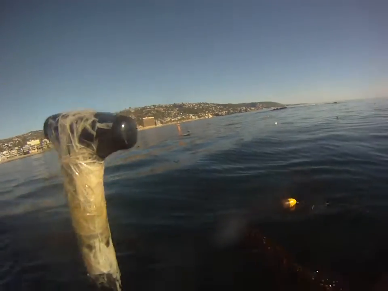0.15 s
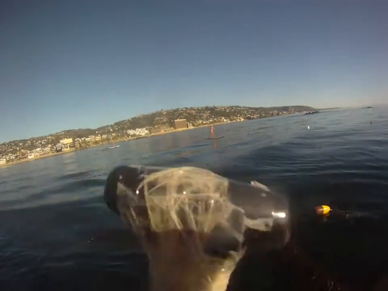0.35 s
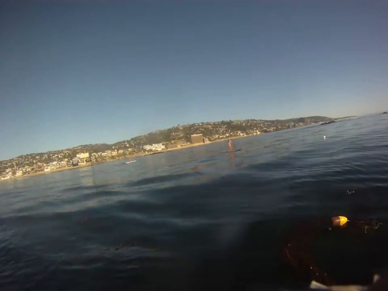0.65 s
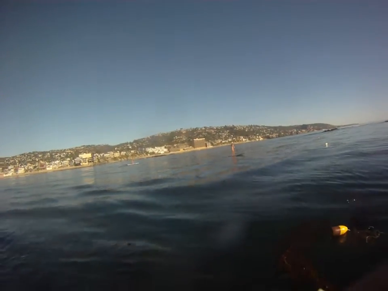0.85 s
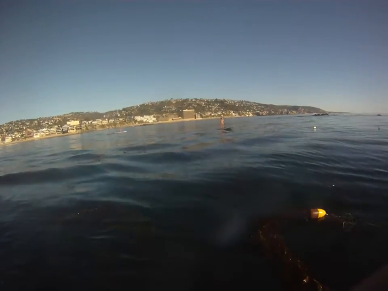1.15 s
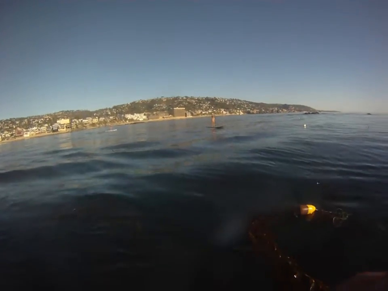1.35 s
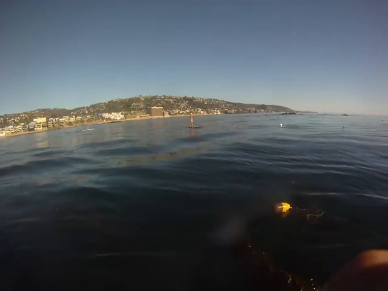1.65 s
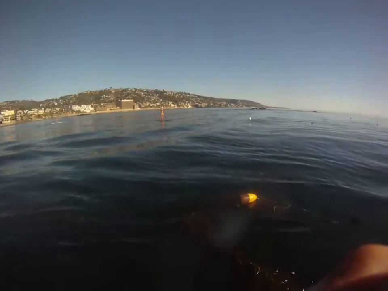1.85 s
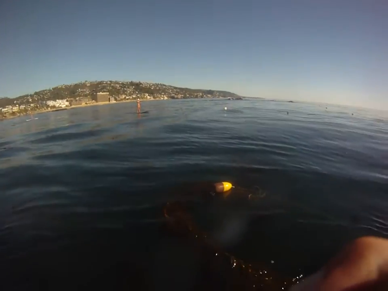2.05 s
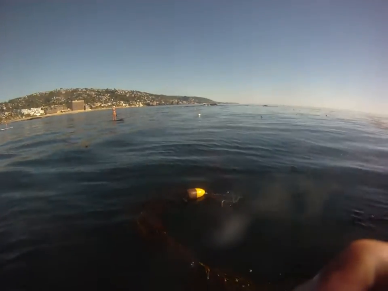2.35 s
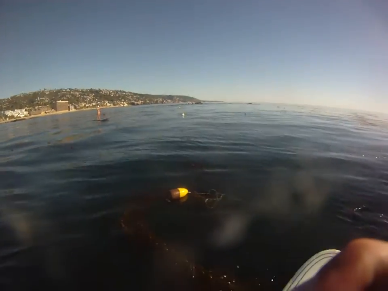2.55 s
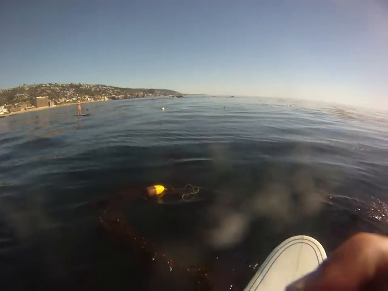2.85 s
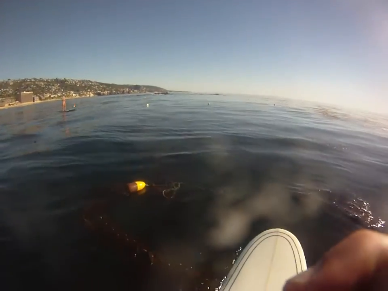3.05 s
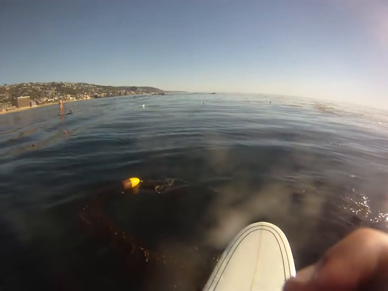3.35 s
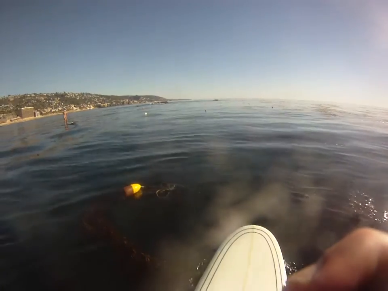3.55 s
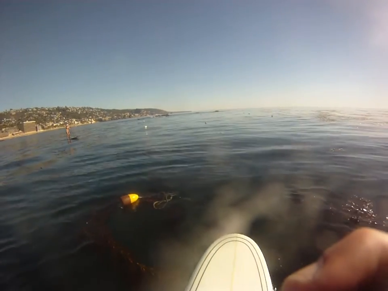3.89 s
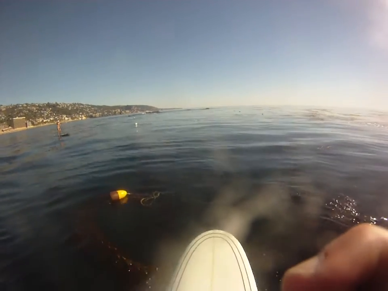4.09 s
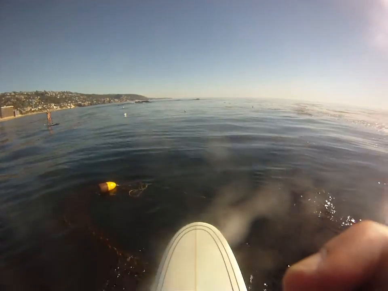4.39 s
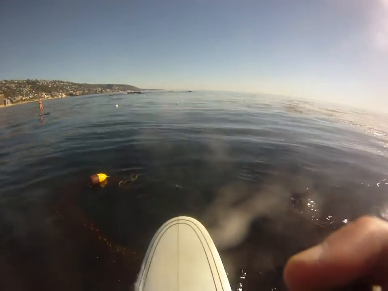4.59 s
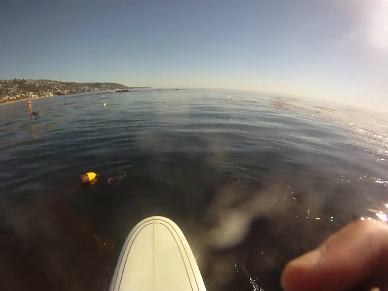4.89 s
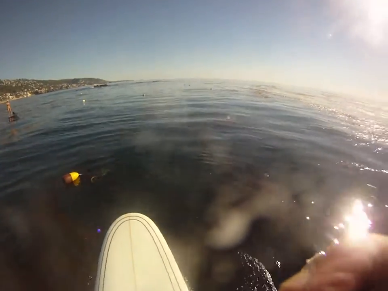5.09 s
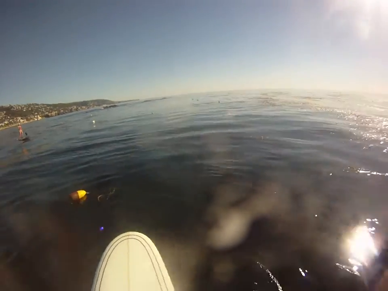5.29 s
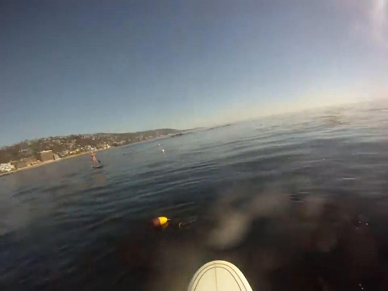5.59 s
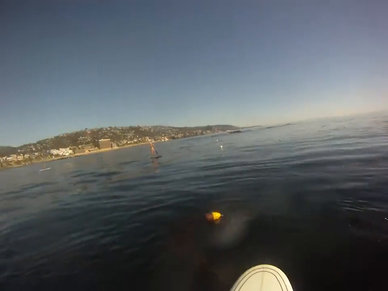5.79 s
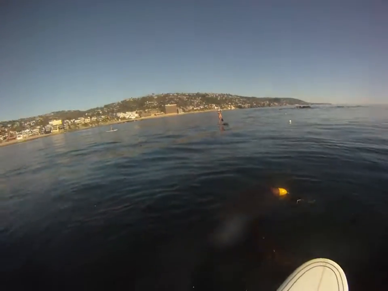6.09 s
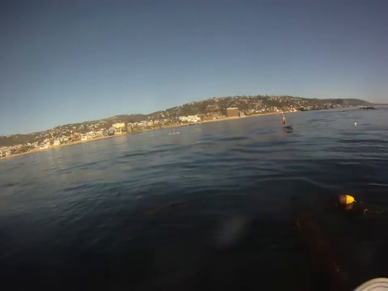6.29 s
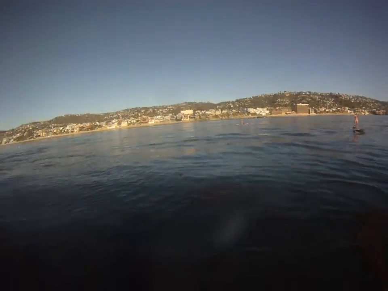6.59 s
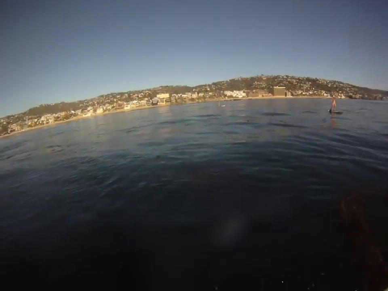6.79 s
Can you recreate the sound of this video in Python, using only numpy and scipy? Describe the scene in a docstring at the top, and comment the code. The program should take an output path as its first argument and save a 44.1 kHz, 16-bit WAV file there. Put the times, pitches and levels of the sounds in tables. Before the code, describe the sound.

Inside a waterproof camera case just above calm sea, a low rumble runs throughout. A wet hand rubs and bumps the casing first, then isolated knocks stand out among faint washes, laps and dripping bubbles. After five seconds a muffled slosh and vigorous rubbing arrive, followed by one hard clack, more short drags and a hollow bump.

```python
"""A camera in a waterproof case rides just above a calm sea on a paddleboard, over a low rumble of noise.
First a wet hand and sleeve rub the case (noise of tiny slips through its resonances) and bump it (dying sines).
Then knocks stand out between small washes, laps and drops of water (noise, bubbles and rising sines).
After five seconds a muffled slosh of bubbles arrives, the rumble lifts and the rubbing returns.
Past six seconds comes the hardest clack, then more drags and a last hollow bump."""
import sys
import numpy as np
from scipy import signal
from scipy.fft import rfft, irfft, next_fast_len
from scipy.io import wavfile
from scipy.ndimage import uniform_filter1d, map_coordinates

SR = 44100
rng = np.random.default_rng(int(sys.argv[2]) if len(sys.argv) > 2 else 0)


def transcribe(u):
    """Save the signal u as a 16-bit wav file named by the first command-line argument.

    u: samples, shape (n,) or (channels, n), limited to [-1, 1]; the rate is SR.
    q: integer samples, one column per channel.
    """
    v = np.clip(np.atleast_2d(u).T, -1, 1)
    q = np.round(v * 32767).astype(np.int16)
    wavfile.write(sys.argv[1], SR, q)


N = 306054  # length [samples]


def amp(db):
    """Decibels to gain."""
    return 10 ** (np.asarray(db) / 20)


def unit(x):
    """Scaled to rms 1."""
    return x / np.sqrt(np.mean(x ** 2) + 1e-20)


def peak_one(x):
    """Scaled to peak 1."""
    return x / np.abs(x).max()


def along(points, hz):
    """(frequency [Hz], value) points joined on a log-frequency axis."""
    f, v = np.transpose(points)
    return np.interp(np.log(hz + 1), np.log(f + 1), v)


def curve(rows):
    """A timed table, one value per sample."""
    return np.interp(np.arange(N) / SR, *np.transpose(rows))


def wobble(rate):
    """A smooth random curve, rate knots a second."""
    knots = rng.standard_normal(int(N * rate / SR) + 4)
    return map_coordinates(knots, [np.arange(N) * rate / SR])


def filtered(x, response):
    """x shaped by a gain that depends on frequency."""
    m = next_fast_len(len(x) + 8192)
    spectrum = rfft(x, m) * response(np.fft.rfftfreq(m, 1 / SR))
    return irfft(spectrum, m)[:len(x)]


def add(track, s, sound):
    """Mix a sound into the track at time s."""
    part = track[max(round(s * SR), 0):][:len(sound)]
    part += sound[:len(part)]


def ring(t, hz, t60):
    """A sine that dies by 60 dB in t60 seconds."""
    return np.sin(2 * np.pi * hz * t) * np.exp(-np.log(1000) * t / t60)


def slips(size, per_second, smooth):
    """Friction: a spray of tiny random slips on an even hiss; rms 1."""
    sparks = rng.standard_normal(size) * (rng.random(size) < per_second / SR)
    return unit(unit(sparks) + smooth * rng.standard_normal(size))


def patchy(x, depth_db):
    """Each band of x flutters by itself, as when the spot of contact shifts; rms 1."""
    bands = signal.stft(x, nperseg=256)[2]
    flutter = rng.standard_normal(bands.shape)
    for _ in range(2):
        flutter = uniform_filter1d(flutter, size=3, axis=0)
        flutter = uniform_filter1d(flutter, size=7, axis=1)
    return unit(signal.istft(bands * amp(depth_db * unit(flutter)), nperseg=256)[1][:N])


def swells(rows, attack_s, release_s):
    """Gain of (start, length, level) events that rise, hold and die away; overlaps add in power."""
    power, t = np.zeros(N), np.arange(SR) / SR
    for s, length, db in rows:
        rise = (1 - np.exp(-t / attack_s)) ** 2
        shape = rise * np.exp(-np.maximum(t - length, 0) / release_s)
        add(power, s, (amp(db) * shape / shape.max()) ** 2)
    return np.sqrt(power)


def bubbles(per_second, centre_hz, spread, cycles, size_db):
    """A cloud of small bubbles, each rising in pitch as it dies; rms 1."""
    count = int(per_second * N / SR)
    start = rng.integers(0, N, (count, 1))
    pitch = rng.standard_normal((count, 1))
    size = rng.exponential(size=(count, 1))
    t = np.arange(600) / SR
    hz = centre_hz * np.exp(spread * np.clip(pitch, -2, 2))
    age = t * hz / cycles
    tone = np.sin(2 * np.pi * hz * t * (1 + 0.04 * np.minimum(age, 4)))
    grains = amp(size_db * np.minimum(size, 4)) * np.exp(-age) * tone
    return unit(np.bincount((start + np.arange(len(t))).ravel(), grains.ravel())[:N])


# air and wall resonances of the case, colouring rubbing and water: (centre [Hz], width [Hz], level [dB])
CASE_RESONANCES = [(924, 183, -3), (1200, 350, -4), (1674, 200, -7.5), (2190, 393, 1.5), (3244, 445, -6),
                   (3647, 292, -3.5), (4570, 1560, -18), (7270, 1300, -21.5), (8350, 280, -9.5),
                   (8890, 175, -11.5), (9763, 250, -9.5), (10680, 790, -23), (13500, 480, -32),
                   (14470, 300, -18), (15270, 300, -21.5)]
# gain laid over the resonances, which deepens or fills their valleys: (frequency [Hz], gain [dB])
CASE_VALLEYS = [(200, 16.5), (500, -2.5), (800, -3.5), (5400, 0), (6000, -13.5), (6500, 0), (11000, 2.5),
                (11500, -6), (12450, -9), (12900, 17.5), (15250, 3), (15600, -31)]


def case(hz):
    """Gain of the case: its resonances add in power, with valleys between them."""
    power = sum(amp(db) ** 2 / (1 + ((hz - centre) / width) ** 2 * 2) ** 2
                for centre, width, db in CASE_RESONANCES)
    return np.sqrt(power) * amp(along(CASE_VALLEYS, hz))


def treble_hiss():
    """A faint, narrow band of hiss high in the treble."""
    band = filtered(rng.standard_normal(N), lambda hz: np.exp(-((hz - 12000) / 200) ** 2))
    return amp(-83) * unit(band)


# wind and handling, before a 5 dB lift: (time [s], level [dB])
RUMBLE_LEVEL = [(0.0, -49.5), (0.09, -48.5), (0.73, -43.5), (4.95, -39.5), (5.37, -29.5), (5.59, -39.5),
                (6.59, -43), (6.82, -36.5), (6.94, -35)]


def rumble():
    """Wind and the holding hand shake the case in soft low lumps."""
    # (frequency [Hz], gain [dB])
    colour = [(10, -2.5), (24, 4.5), (50, -2.5), (70, -9), (100, -14.5), (150, -22.0),
              (220, -30), (350, -35.5), (700, -42.5), (2000, -67.0)]
    low = unit(filtered(rng.standard_normal(N), lambda hz: amp(along(colour, hz))))
    # even out the noise's own swells, then give it new ones
    swell = np.sqrt(np.abs(uniform_filter1d(low ** 2, SR // 5)) + 1e-6)
    lumps = unit(low / swell * amp(2.8 * np.clip(wobble(16), -2, 1.5)))
    return lumps * amp(curve(RUMBLE_LEVEL) + 5.0)


# tone of the washing water before the case: (frequency [Hz], gain [dB])
WATER_TONE = [(200, 3.5), (500, 12), (900, 0.5), (1500, -3), (2150, -4), (2560, 1.5), (3500, -3.5),
              (5000, 2.5), (7000, 1.5), (8500, -5), (9450, 0), (9900, -4), (15000, -3)]
# wavelets washing along the board: (start [s], length [s], level [dB])
WAVELET_EVENTS = [(1.28, 0.069, -58), (1.68, 0.056, -67), (2.32, 0.096, -61), (2.75, 0.1, -59.5),
                  (3.45, 0.03, -56), (3.77, 0.12, -53.5), (3.97, 0.089, -61), (4.14, 0.08, -59.5),
                  (4.43, 0.25, -55.5), (4.8, 0.13, -64.5), (4.94, 0.096, -60)]
WAVELET_ATTACK_S, WAVELET_RELEASE_S = 0.014, 0.054  # a quick rise and slower draining
RIPPLE_DB = -61  # constant ripples under the wavelets
# low, muffled slosh against the board: (start [s], length [s], level [dB])
SLOSH_EVENTS = [(5.08, 0.093, -55), (5.255, 0.2, -50), (5.325, 0.029, -38.5)]
SLOSH_ATTACK_S, SLOSH_RELEASE_S = 0.018, 0.015
# little laps, each a brief burst around one pitch: (start [s], length [s], level [dB], pitch [Hz])
LAP_EVENTS = [(0.378, 0.0085, -41.5, 1190), (1.041, 0.039, -55.5, 930), (2.129, 0.18, -59, 1040),
              (2.833, 0.018, -55, 660), (3.803, 0.09, -54, 2440), (4.497, 0.05, -55.5, 2500),
              (4.645, 0.031, -53.5, 2500), (6.479, 0.06, -53.5, 1010), (6.584, 0.079, -51, 1010),
              (6.891, .018, -66, 1970)]
# single drops, before a 1.5 dB trim: (time [s], level [dB], pitch [Hz], 60 dB decay [s])
DROP_EVENTS = [(2.8295, -40, 2160, 0.035), (2.8962, -42, 2200, 0.029), (3.7998, -39, 2450, 0.038),
               (4.4282, -34.5, 1360, 0.048), (4.845, -45, 2540, 0.026)]


def water():
    """Ripples fizz and lap along the board, a slosh rolls against it, and drops ring as rising bubbles."""
    fizz = slips(N, per_second=1100, smooth=1.3)
    fizz += 0.28 * bubbles(per_second=900, centre_hz=2000, spread=0.45, cycles=4, size_db=2)
    toned = filtered(fizz, lambda hz: case(hz) * amp(along(WATER_TONE, hz)))
    wash = patchy(toned, depth_db=2.2)
    flow = np.hypot(amp(RIPPLE_DB), swells(WAVELET_EVENTS, WAVELET_ATTACK_S, WAVELET_RELEASE_S))
    out = wash * flow * amp(1.7 * wobble(36))

    slosh = bubbles(per_second=1700, centre_hz=800, spread=0.49, cycles=1.6, size_db=1.5)
    out += swells(SLOSH_EVENTS, SLOSH_ATTACK_S, SLOSH_RELEASE_S) * amp(wobble(90)) * slosh

    for s, length, db, pitch_hz in LAP_EVENTS:
        u = np.linspace(0, 1, int(length * SR))
        band = lambda hz: 1 / (1 + ((hz - pitch_hz) / 200) ** 2)
        lap = unit(filtered(rng.standard_normal(len(u)), band))
        early_swell = np.sqrt(np.abs(np.sin(np.pi * np.sqrt(u))))
        add(out, s, amp(db) * lap * early_swell)

    t = np.arange(SR // 5) / SR
    for s, db, hz, t60 in DROP_EVENTS:
        impact = 0.8 * ring(t, hz * 0.55, 0.0035)
        # a bubble and a smaller companion ring and rise
        bubble = ring(t, hz * (1 + 1.1 * t), t60)
        companion = 0.31 * ring(t, hz * 1.09 * (1 + 2.0 * t), t60)
        add(out, s, amp(db - 1.5) * (impact + bubble + companion))
    return out


# long drags of hand and sleeve over the case: (start [s], length [s], level [dB])
SLIDE_EVENTS = [(.178, 0.056, -49.5), (.298, 0.097, -43.5), (.39, .105, -42.5), (.525, 0.08, -45),
                (.565, 0.15, -41), (.765, 0.044, -50), (.83, 0.12, -57), (.942, 0.062, -46.5),
                (1.105, 0.16, -51), (1.955, 0.062, -47.5), (2.24, 0.021, -46.5), (5.025, 0.094, -51.5),
                (5.135, 0.051, -42), (5.228, 0.036, -44), (5.325, 0.19, -40), (5.53, 0.026, -41.5),
                (5.592, .2, -40.5), (5.675, 0.087, -36.5), (5.78, 0.05, -46), (5.85, 0.035, -58),
                (6.08, 0.034, -54), (6.15, 0.068, -50.5), (6.225, 0.058, -48.5), (6.308, 0.098, -44),
                (6.526, 0.039, -43.5), (6.69, 0.081, -47), (6.85, .09, -52.5)]
SLIDE_ATTACK_S, SLIDE_RELEASE_S = 0.011, 0.019  # the hand takes hold and lets go
SLIDE_USUAL_DB = -45
# brightness [dB per octave] at the usual level, and its rise per dB of level
SLIDE_TILT_DB, SLIDE_TILT_GROWS = -2.5, 0.053


def sliding():
    """Skin and sleeve drag over the case; the grip wavers, and louder slides are brighter."""
    friction = slips(N, per_second=2200, smooth=0.75)
    rub = patchy(filtered(friction, case), depth_db=2.7)
    treble = filtered(rub, lambda hz: hz ** 2 / (hz ** 2 + 5000 ** 2))
    drag = swells(SLIDE_EVENTS, SLIDE_ATTACK_S, SLIDE_RELEASE_S)
    drag_db = 20 * np.log10(drag + 1e-6)
    tilt_db = SLIDE_TILT_DB + SLIDE_TILT_GROWS * (drag_db - SLIDE_USUAL_DB)
    # the treble is taken as two octaves above the body
    rub = rub + (amp(2 * tilt_db) - 1) * treble
    return rub * drag * amp(0.44 * wobble(45))


# quick scuffs on the case: (start [s], length [s], level [dB], favoured pitch [Hz], emphasis [dB])
SCUFF_EVENTS = [(0.655, 0.059, -32.5, 2200, 8.5), (1.062, 0.02, -49, 3500, 6),
                (1.163, 0.01, -41.5, 2120, 12), (1.291, 0.018, -46, 1800, 13), (1.889, 0.015, -58, 3600, 6),
                (2.143, 0.032, -53.5, 3380, 6), (2.367, 0.028, -52.5, 3300, 4.5),
                (2.408, 0.028, -53.5, 3270, 3), (2.467, 0.023, -56, 3330, 4.5),
                (2.517, 0.023, -56, 3350, 8), (2.58, 0.036, -53, 2260, 6), (3.218, 0.02, -57.5, 3380, 7),
                (4.867, .0123, -51.5, 3650, 3), (5.324, 0.012, -40, 2080, 9),
                (5.37, 0.024, -29.5, 3320, 11), (5.432, .03, -25.5, 2000, 2.5),
                (6.314, .045, -37.5, 2200, 3.5)]


def scuffs():
    """Short hard drags swell and let go, each favouring its own pitch."""
    out = np.zeros(N)
    for s, length, db, pitch_hz, emphasis_db in SCUFF_EVENTS:
        u = np.linspace(0, 1, int(length * SR))
        colour = lambda hz: case(hz) * amp(emphasis_db * np.exp(-((hz - pitch_hz) / 350) ** 2))
        rub = unit(filtered(slips(len(u), per_second=4000, smooth=0.82), colour))
        swell = np.abs(np.sin(np.pi * u)) ** 0.5
        add(out, s, amp(db) * rub * swell)
    return out


# bumps on the case:
# (time [s], thump [dB], thump pitch [Hz], shell [dB], favoured pitch [Hz], hollow ring [dB])
KNOCK_EVENTS = [(0.596, -23, 156, -43, 298, -55), (0.655, -18.5, 48, -58, 330, -60),
                (.8405, -18, 77, -45.5, 500, -53), (2.078, -11, 73, -40, 735, -35.5),
                (2.1598, -11.5, 63, -44, 500, -58), (2.5395, -7.5, 96, -26.5, 1150, -37),
                (3.0671, -7.5, 144, -18.5, 1200, -31.5), (4.2174, -19, 69, -40, 1060, -37.5),
                (5.249, -4, 98, -20, 2080, -31), (5.4159, -23, 159, -23, 1280, -50),
                (5.475, -15.5, 69, -33, 900, -42), (6.1642, -11, 227, -2, 740, -28),
                (6.1699, -18, 302, -17, 574, -33.5), (6.186, -19.5, 89, -36, 560, -35),
                (6.8363, -26, 130, -39, 900, -21.5), (6.85, -14.5, 60.4, -46, 500, -43)]
# modes of the struck shell, a brief clack: (frequency [Hz], relative level [dB], 60 dB decay [s])
SHELL_MODES = [(312, -21, 0.046), (522, 13.5, 0.0094), (880, 11, 0.0093), (1287, -7.5, 0.022),
               (2084, -7, 0.034), (2720, -10.5, 0.031), (4150, -1, 0.013), (7400, 22.5, 0.0049)]
# modes of the small hard latch: (frequency [Hz], relative level [dB], 60 dB decay [s])
LATCH_MODES = [(9200, -13, 0.015), (10700, -3, 0.014), (11200, 0, 0.022), (12910, 1.5, 0.023),
               (14090, -46, .014)]
# longer, hollow ring of the case on its grip: (frequency [Hz], relative level [dB], 60 dB decay [s])
HOLLOW_MODES = [(164, 3, 0.21), (216, 1, 0.12), (342, -2, 0.11), (438, -0.5, 0.052), (884, 1.5, 0.057),
                (1220, -8.5, 0.068)]
# cut-off at a shell level of 0 dB; softer blows are duller
CONTACT_HZ, CONTACT_DB_PER_OCTAVE = 2350, 29.5
TICK_DB, TICK_GROWS = -18, 0.64  # latch at a shell level of 0 dB; its dB per dB of shell


def struck(modes, t):
    """Modes ringing together, their levels and pitches a little different at each blow."""
    return sum(amp(db + rng.normal(0, 3.7)) * ring(t, hz * (1 + rng.normal(0, 0.0032)), t60)
               for hz, db, t60 in modes)


def struck_shell(t, favoured_hz, contact_hz):
    """The spot that is hit favours modes near one pitch; softer contact dulls the clack."""
    shell = np.zeros(len(t))
    for k, (hz, db, t60) in enumerate(SHELL_MODES):
        favour_db = 15.2 * np.exp(-(np.log(hz / favoured_hz) / 0.18) ** 2)
        shell += (-1) ** k * amp(db + favour_db) * ring(t, hz, t60)
    b, a = signal.butter(3, min(contact_hz, SR / 3), fs=SR)
    return signal.lfilter(b, a, shell)


def knocks():
    """Each bump heaves the camera, clacks the shell, rings the case hollow and ticks the latch."""
    out, t = np.zeros(N), np.arange(SR // 4) / SR
    for s, thump_db, thump_hz, shell_db, favoured_hz, hollow_db in KNOCK_EVENTS:
        # the grip damps the thump by 60 dB in 3.4 cycles
        thump = ring(t, thump_hz, 3.4 / thump_hz)

        contact_hz = CONTACT_HZ * 2 ** (shell_db / CONTACT_DB_PER_OCTAVE)
        shell = struck_shell(t, favoured_hz, contact_hz)
        low_noise = filtered(rng.standard_normal(len(t)), lambda hz: 1 / (1 + (hz / 900) ** 4))
        rattle = unit(low_noise) * np.exp(-t / 0.023)
        clack = peak_one(shell) + 0.021 * rattle

        # the latch starts with a bright, very short crack
        crack = np.diff(rng.standard_normal(len(t) + 1)) * np.exp(-t / 0.004)
        tick = peak_one(struck(LATCH_MODES, t) + 0.34 * crack)
        tick_db = TICK_DB + TICK_GROWS * shell_db

        hollow = peak_one(struck(HOLLOW_MODES, t))
        body = amp(thump_db) * thump + amp(hollow_db) * hollow
        add(out, s, body + amp(shell_db) * clack + amp(tick_db) * tick)
    return out


def scene():
    """All sources at the one microphone, from background to foreground."""
    return (treble_hiss() + rumble() + water() + sliding() + scuffs() + knocks())[None]


TOP_HZ = 15750


def record(dry):
    """The camera cuts steeply above its band limit."""
    band_limit = lambda hz: 1 / (1 + (hz / TOP_HZ) ** 120)
    return np.array([filtered(channel, band_limit) for channel in dry])


dry = scene()
out = record(dry)
transcribe(out)
```